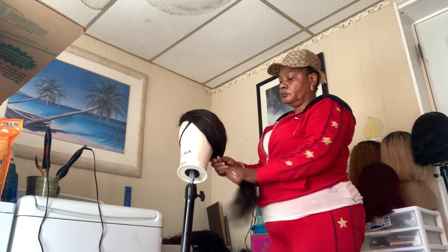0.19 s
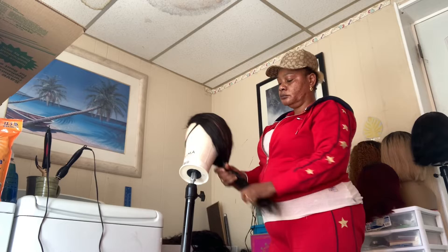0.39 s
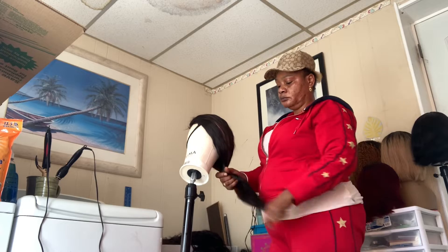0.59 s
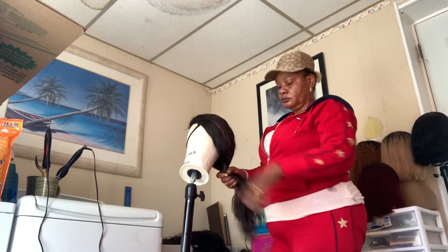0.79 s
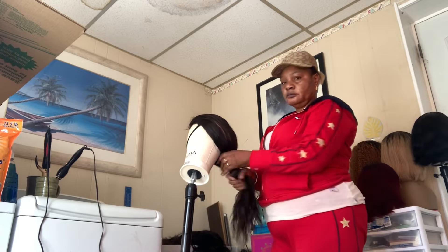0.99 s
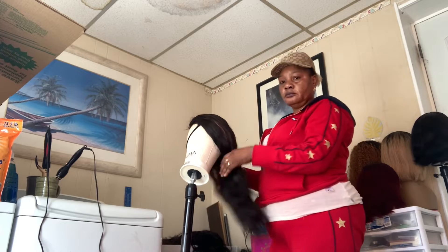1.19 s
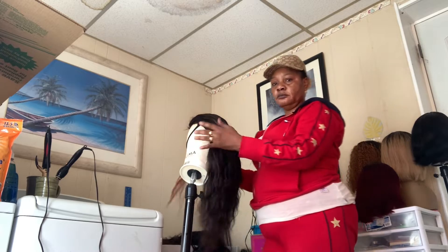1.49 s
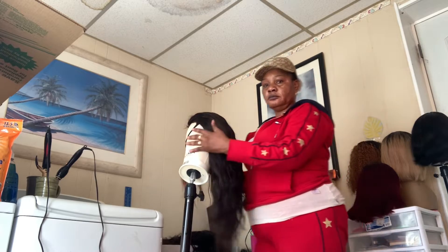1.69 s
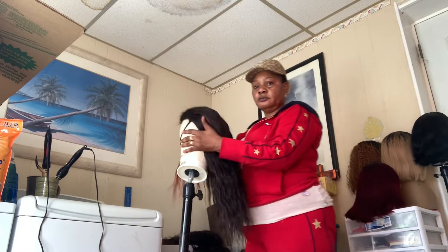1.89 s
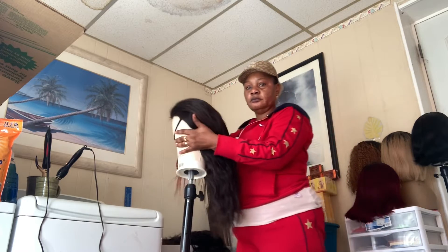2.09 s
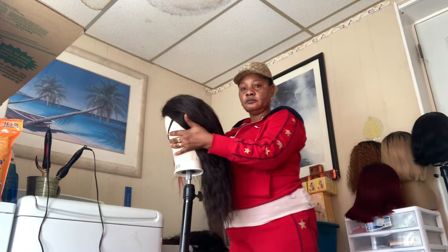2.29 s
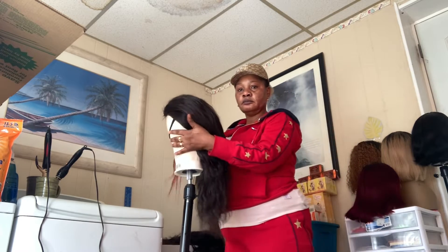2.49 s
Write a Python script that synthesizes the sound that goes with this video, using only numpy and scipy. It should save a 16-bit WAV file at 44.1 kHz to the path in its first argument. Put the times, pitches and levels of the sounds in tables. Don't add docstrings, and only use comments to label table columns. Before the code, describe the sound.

Bright metallic clinks and light plastic taps as hands handle long synthetic hair in a small room

```python
import sys
import numpy as np
from scipy import signal
from scipy.fft import rfft, irfft
from scipy.io import wavfile
from scipy.ndimage import uniform_filter1d

SR = 44100
rng = np.random.default_rng(int(sys.argv[2]) if len(sys.argv) > 2 else 0)


def unload_audio(sound):
    columns = np.transpose(np.atleast_2d(sound))
    steps = np.round(np.clip(columns, -1, 1) * 32767)
    wavfile.write(sys.argv[1], SR, steps.astype(np.int16))


def amplitude_ratio(level_db):
    exponent = np.asarray(level_db, float) / 20
    return 10 ** exponent


N = 114660
TAIL = 16384


def shape(table, hz):
    table = np.array(table)
    return np.interp(np.log(hz + 1), np.log(table[:, 0]), table[:, 1])


def unit(x):
    return x / np.sqrt(np.mean(x ** 2))


def coloured(x, table):
    hz = np.fft.rfftfreq(len(x), 1 / SR)
    return irfft(rfft(x) * amplitude_ratio(shape(table, hz)), len(x))


def walk(rate_hz):
    hold = int(SR / rate_hz)
    steps = np.repeat(rng.standard_normal(N // hold + 1), hold)
    return 1.3 * uniform_filter1d(uniform_filter1d(steps, hold), hold)[:N]


# pitch_hz, t60_s
ROOM_DECAY = [(300, 0.12), (1000, 0.17), (3000, 0.18), (8000, 0.14), (16000, .1)]


def echoes(table, tilt_db=0):
    spike_db, tail_db, scatter_db = 9, -6, 2.5
    direct_s, build_cycles = .0025, 3
    t, hz = np.arange(TAIL) / SR, np.fft.rfftfreq(TAIL, 1 / SR)
    tint = amplitude_ratio(shape(table, hz) + tilt_db * np.log2(hz / 4000 + 0.033))
    clumps = np.repeat(rng.standard_normal(TAIL // 32), 32)
    noise = rfft(rng.standard_normal(TAIL) * amplitude_ratio(scatter_db * clumps)) * tint
    spike = np.roll(irfft(tint * np.minimum(hz / 4000, 1) ** 2, TAIL), 12)
    out = amplitude_ratio(spike_db) * spike * (t < .001)
    for centre_hz in 250 * 2. ** np.arange(7):
        octave = np.clip(1 - np.abs(np.log2(hz / centre_hz + 1e-9)), 0, 1)
        band = irfft(noise * octave, TAIL)
        fade = np.exp(-t / direct_s) + amplitude_ratio(tail_db - 60 * t / shape(ROOM_DECAY, centre_hz))
        out = out + band * fade * (1 - np.exp(-t * centre_hz / build_cycles))
    return out


def place(sound, at_s, db):
    out, start = np.zeros(N + 2 * TAIL), int(at_s * SR) + TAIL // 2
    out[start:start + TAIL] = sound * amplitude_ratio(db - 12) / np.std(sound[:SR // 50])
    return out[TAIL // 2:][:N]


def struck(hits, modes, modes_db, click):
    mode_scatter_db, ring_direct_db = 1.5, -7
    t, out = np.arange(TAIL) / SR, 0
    hz, t60 = np.array(modes).T[:, :, None]
    rings = amplitude_ratio(-60 * t / t60) * np.sin(2 * np.pi * hz * t) * (1 - np.exp(-t * hz))
    direct = amplitude_ratio(ring_direct_db) * rings / rings.std(1, keepdims=True)
    for at_s, db, tilt_db, ring_db in hits:
        room = rfft(echoes([(100, 0), (20000, 0)]), 2 * TAIL)
        wet = irfft(rfft(rings, 2 * TAIL) * room)[:, :TAIL]
        both = wet / wet.std(1, keepdims=True) + direct
        strengths_db = np.c_[modes_db] + mode_scatter_db * rng.standard_normal(hz.shape)
        ring = (both * amplitude_ratio(strengths_db)).sum(0)
        out = out + place(unit(echoes(click, tilt_db)) + amplitude_ratio(ring_db) * unit(ring), at_s, db)
    return out


# pitch_hz, level_db
HISS_COLOUR = [(15, -55), (25, -9.5), (108, -8), (326, -13), (405, -16.5), (714, -22), (936, -23),
               (1560, -28.5), (16000, -35.5)]


def room_tone():
    hiss_db, hum_hz, hum_db = -67, 119, -76.5
    phase = 2 * np.pi * np.cumsum(hum_hz + 1.6 * walk(5.3)) / SR
    hum = np.sin(phase) * amplitude_ratio(hum_db + 1.5 + 2.5 * walk(8.8))
    hiss = unit(coloured(rng.standard_normal(N), [(5, -62)] + list(HISS_COLOUR)))
    return hiss * amplitude_ratio(hiss_db) + hum


# at_s, level_db, pitch_hz, length_s
THUMPS = [
    (0.094, -68.5, 81, 0.019),
    (.5, -68.5, 69.6, .12),
    (0.959, -60.5, 119, 0.023),
    (1.024, -64.5, 73, 0.092),
    (1.579, -64.5, 108, 0.024),
    (1.667, -62.5, 131, .05),
    (1.747, -70, 69, 0.066),
    (1.988, -65, 75, 0.078),
    (2.506, -68, 72, .1),
]


def thumps():
    t, out = np.arange(N) / SR, 0
    for at_s, db, hz, length_s in THUMPS:
        colour = [(hz * .5, -40), (hz * .85, 0), (hz * 1.15, 0), (hz * 2.2, -35)]
        low = unit(coloured(rng.standard_normal(N), colour))
        out = out + low * amplitude_ratio(db) * np.exp(-((t - at_s) / length_s) ** 2)
    return out


# at_s, peak_db
KNOCKS = [
    (-.03, -34.5),
    (-.008, -38),
    (.0086, -33.5),
    (0.015, -33.5),
]
# pitch_hz, level_db
KNOCK_CLICK = [(88, -39), (150, 2), (376, -4.5), (1530, -10), (1790, -7.5), (3100, -14.5), (4000, -8),
               (16000, -22)]


def knocks():
    return sum(place(echoes(KNOCK_CLICK), at_s, db) for at_s, db in KNOCKS)


# at_s, peak_db, centre_hz, width_hz
TICKS = [
    (.2065, -52, 8200, 1500),
    (.4348, -43, 5000, 7000),
    (.4352, -44, 3750, 1100),
    (.505, -60, 3750, 900),
    (.6805, -49, 11800, 1800),
    (.947, -66, 7000, 3000),
    (2.273, -59, 8000, 8000),
    (2.304, -57, 2200, 3000),
]


def ticks():
    out = 0
    for at_s, db, hz, width in TICKS:
        bump = [(max(hz - width, 100), -40), (hz - width / 2, -6), (hz, 0),
                (hz + width / 2, -6), (hz + width, -40)]
        out = out + place(echoes(bump), at_s, db)
    return out


# at_s, level_db
STROKE = [(0.01, -65), (.4, -73), (.52, -69), (.61, -66), (.69, -72), (.9, -71.5), (.97, -76),
          (1.19, -73.5), (1.3, -78.5), (1.6, -81), (2.0, -70.5), (2.15, -70.5), (2.29, -71.5),
          (2.45, -67.5), (2.59, -69.5)]
# pitch_hz, level_db
HAIR_COLOUR = [(300, -12), (700, -6.5), (1500, -4), (3200, -2), (4500, -4.5), (7000, -6), (10000, -9.5),
               (15000, -10.5)]


def hair():
    fibres_per_s, scatter_db, scatter_cap, smear_s = 3300, 5, 2.5, 0.0049
    slips = rng.random(N) < fibres_per_s / SR
    slips = slips * amplitude_ratio(scatter_db * np.minimum(rng.exponential(size=N), scatter_cap))
    smear = rng.standard_normal(1024) * np.exp(-np.arange(1024) / SR / smear_s)
    slips = signal.fftconvolve(slips, smear)[:N]
    spectrum = rfft(slips)
    flat = irfft(spectrum / uniform_filter1d(np.abs(spectrum), size=400), N)
    stroke_db = np.interp(np.arange(N) / SR, *np.array(STROKE).T) + 1.5 * walk(7)
    return unit(coloured(flat, HAIR_COLOUR)) * amplitude_ratio(stroke_db)


# at_s, peak_db, brightness_db_per_octave, ring_db
TAPS = [(.3008, -30, 0, -4), (.315, -36.5, -1.8, -4), (.3368, -32, 0.9, -33), (1.0866, -38, -3.5, -3.5),
        (1.6986, -43, -3.5, -1.5), (1.733, -31.5, -0.1, -3.5), (1.7942, -29, 0.2, -2.5),
        (1.8195, -30, .2, -3), (1.832, -33.5, 1, -3.5), (1.8862, -40, 0, -9), (1.9151, -26.5, 0.7, -4)]
# pitch_hz, own t60_s
SHELL_MODES = [(410, .04), (560, .04), (1330, .05), (1960, .025), (2200, .025), (2780, .03), (3740, .04),
               (4700, .02), (6000, .02)]
SHELL_DB = [-13, -11, -5, -6, -10, -9, -2.5, -8, -10]
# pitch_hz, level_db
SHELL_CLICK = [(120, -44), (200, -5), (509, -2.5), (950, -7), (1350, -3.5), (2380, -9), (3760, -6.5),
               (14900, -14), (16000, -23)]


def plastic_taps():
    return struck(TAPS, SHELL_MODES, SHELL_DB, SHELL_CLICK)


# at_s, peak_db, brightness_db_per_octave, ring_db
CLINKS = [
    (.2118, -18, 1.4, -10.5),
    (.2133, -18, -2.2, -0.5),
    (.7395, -31, 4, -18),
    (.7447, -16, 0.3, -5),
    (.7475, -18.5, 3, -3.5),
    (.7636, -26, 3.7, -3.5),
    (1.3652, -29.5, -0.1, -2.5),
]
# pitch_hz, own t60_s
ROD_MODES = [(700, .05), (1184, .08), (2520, .07), (3450, .025), (4000, .025), (4719, .06), (7612, .075),
             (11116, .08), (15301, .06)]
ROD_DB = [-18, -7, -8, -9, -7, -7, -5, .1, -4]
# pitch_hz, level_db
ROD_CLICK = [(450, -105), (700, -23), (1150, -5.5), (2070, -6.5), (2700, -2), (4750, 0.5), (8000, -13),
             (11500, -6), (16000, -19.5)]


def steel_clinks():
    return struck(CLINKS, ROD_MODES, ROD_DB, ROD_CLICK)


def scene():
    bed = room_tone() + thumps() + knocks() + ticks() + hair()
    return (bed + plastic_taps() + steel_clinks())[None]


def low_pass(x):
    return signal.sosfilt(signal.butter(12, 16950, fs=SR, output="sos"), x)


def record(dry):
    top_hz, low_cut_hz = 15800, 50
    top = signal.sosfilt(signal.ellip(8, .5, 24, top_hz, fs=SR, output="sos"), dry)
    trimmed = signal.sosfilt(signal.butter(3, low_cut_hz, "high", fs=SR, output="sos"), top)
    return low_pass(trimmed)


dry = scene()
out = record(dry)
unload_audio(out)
```